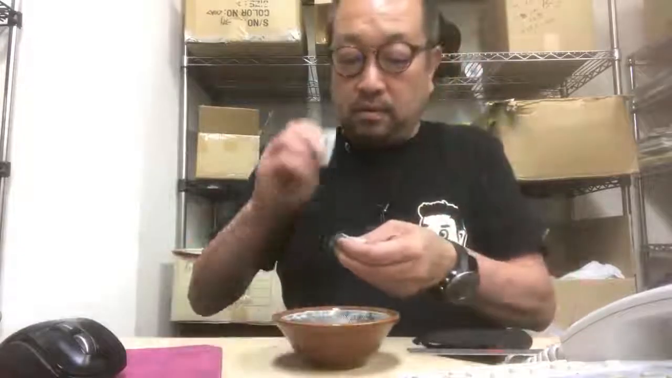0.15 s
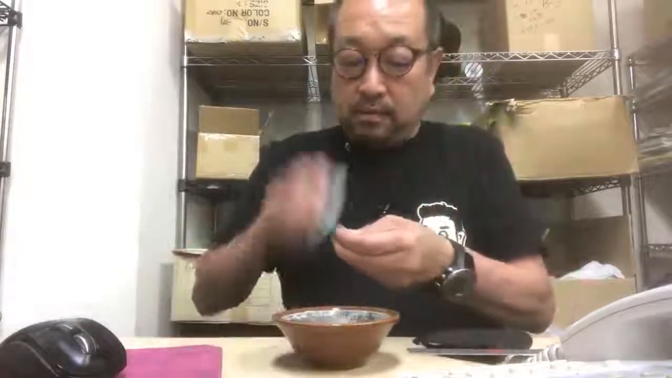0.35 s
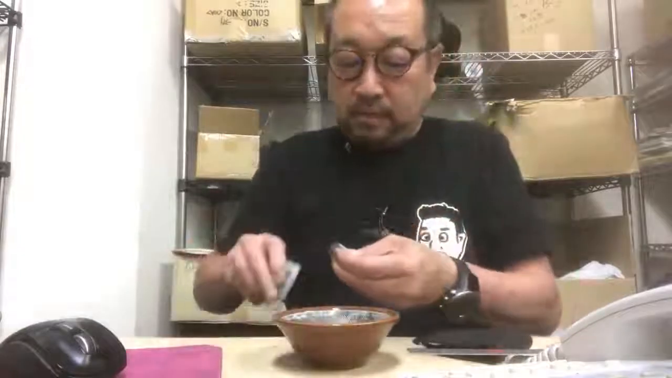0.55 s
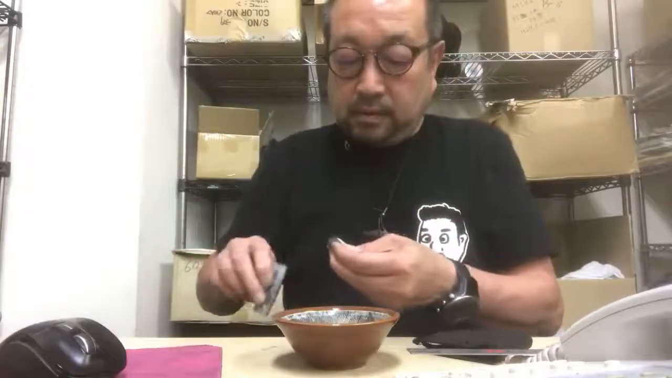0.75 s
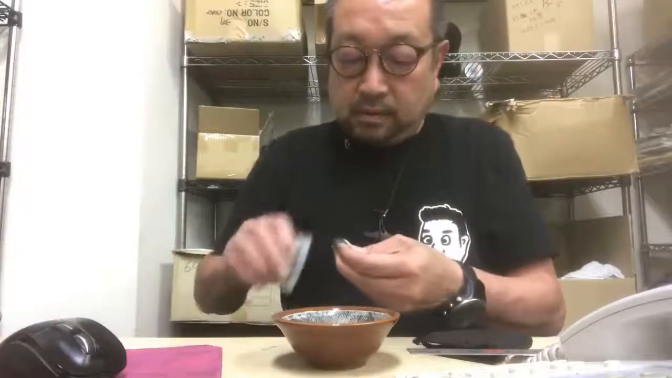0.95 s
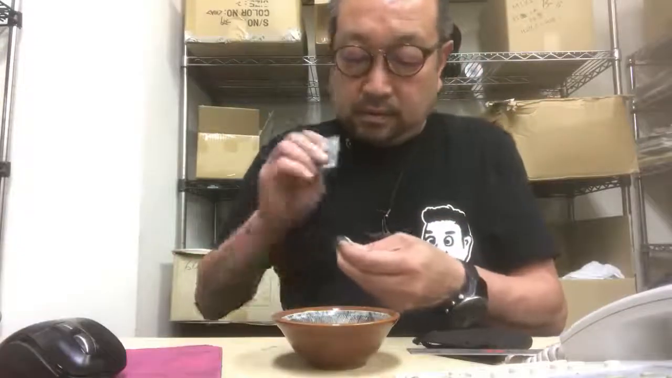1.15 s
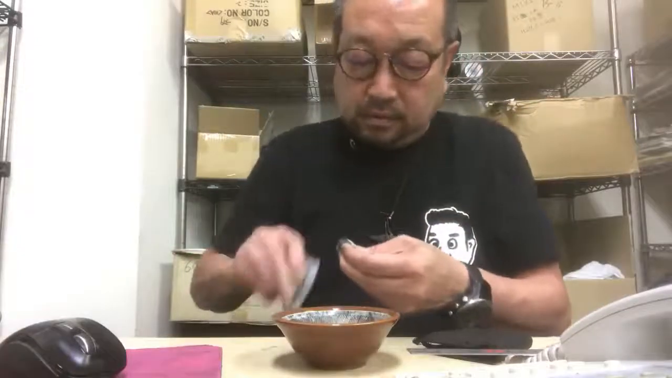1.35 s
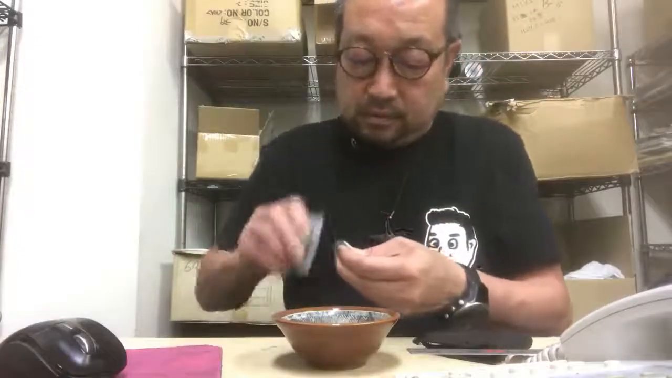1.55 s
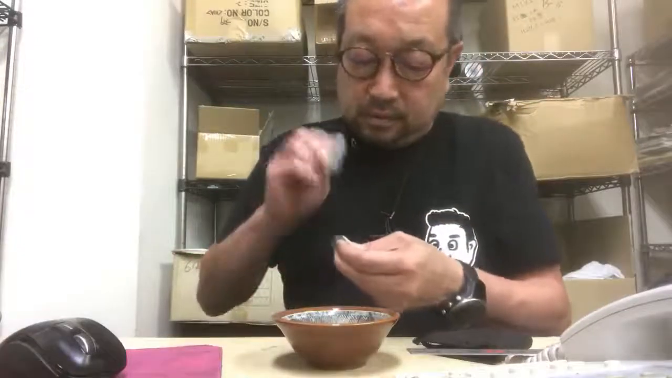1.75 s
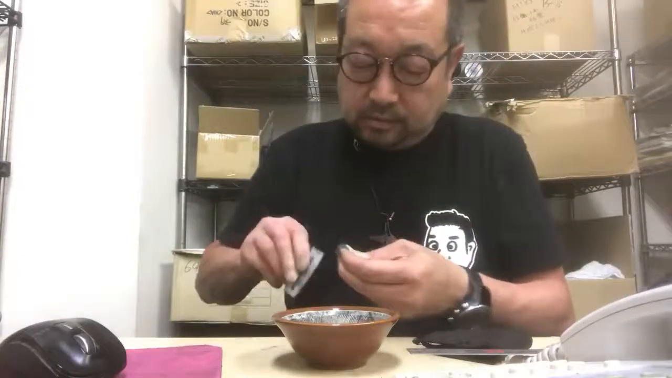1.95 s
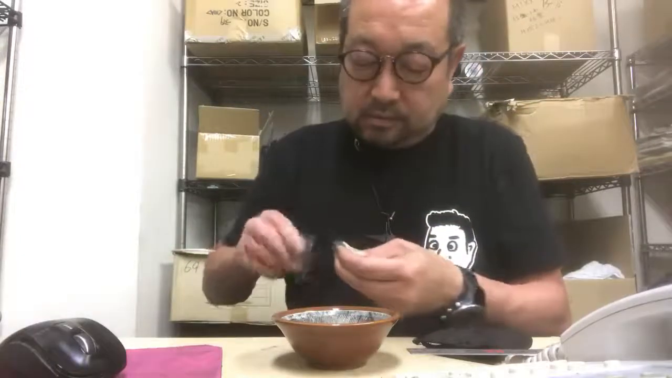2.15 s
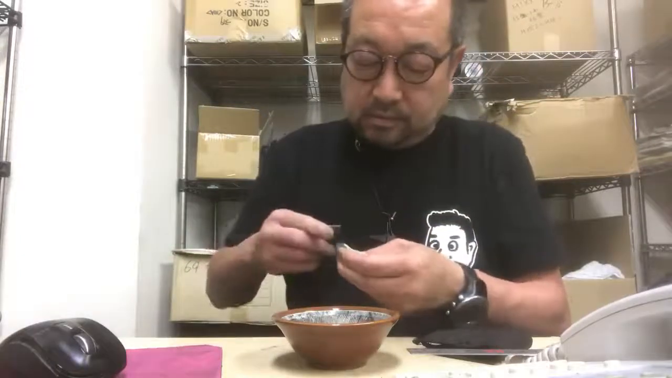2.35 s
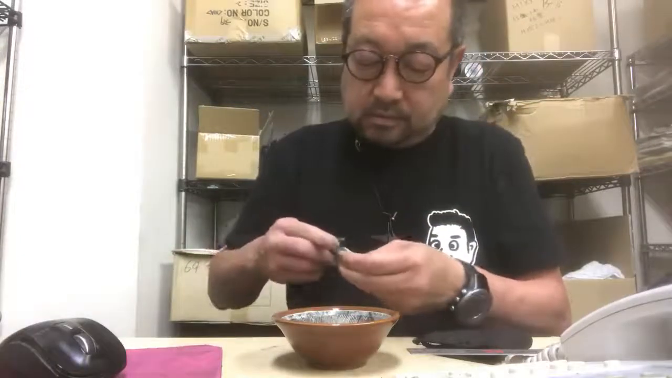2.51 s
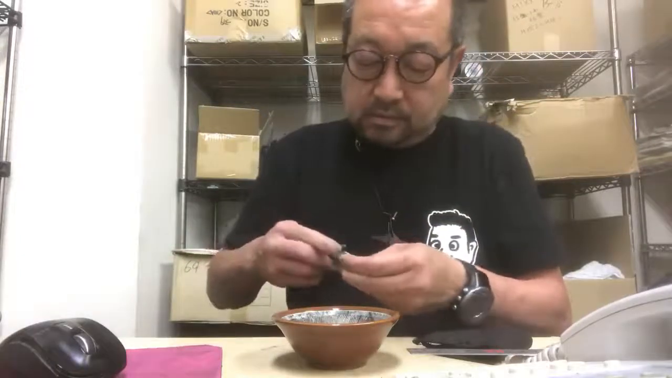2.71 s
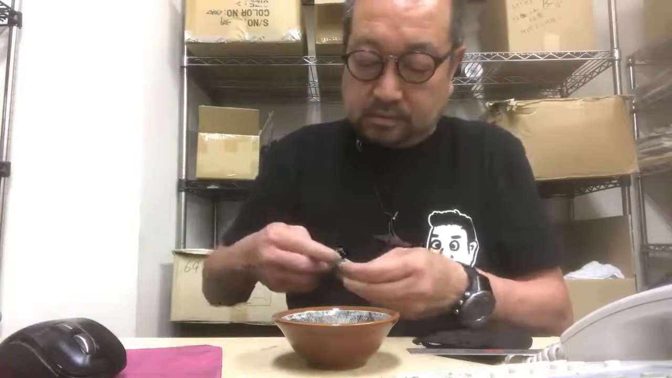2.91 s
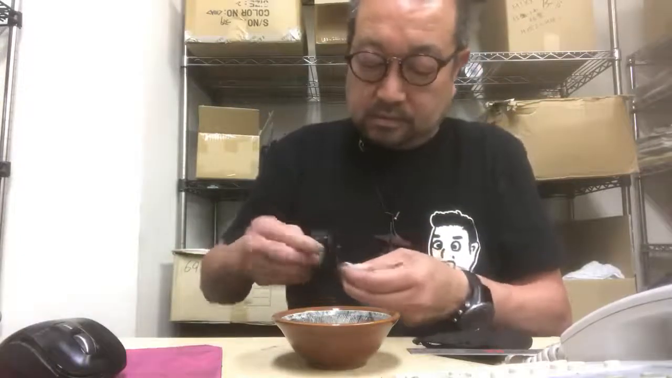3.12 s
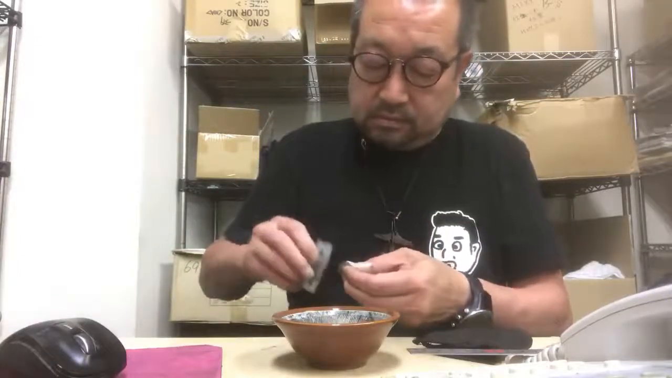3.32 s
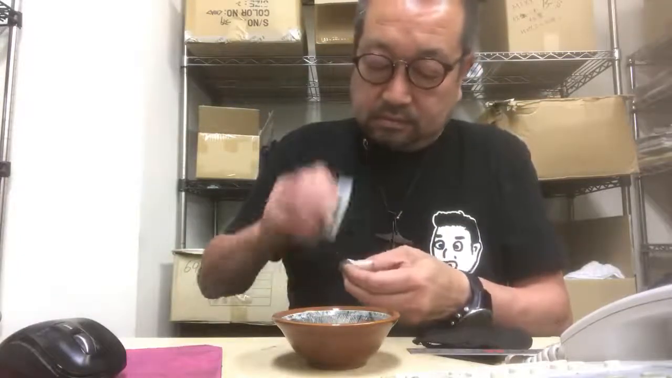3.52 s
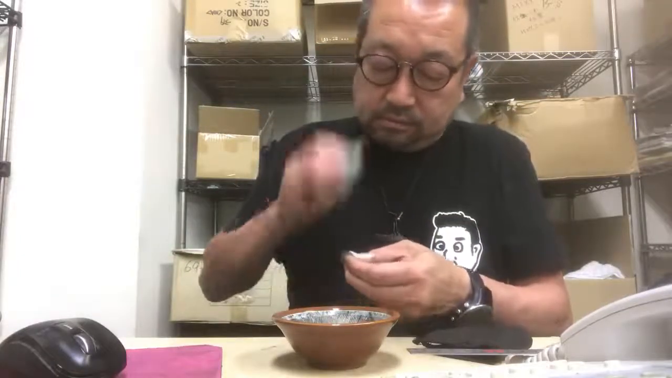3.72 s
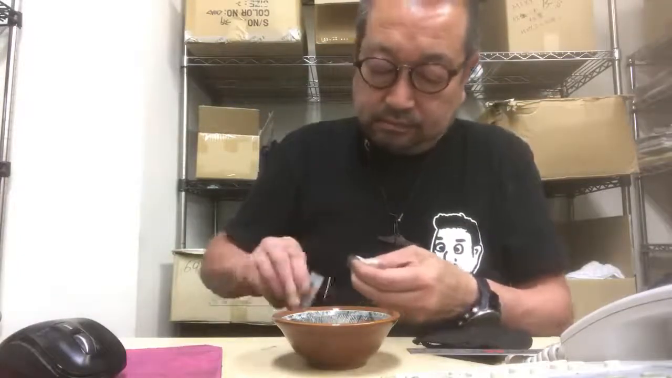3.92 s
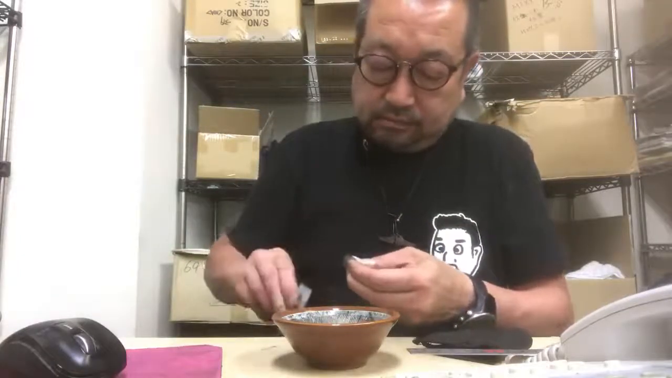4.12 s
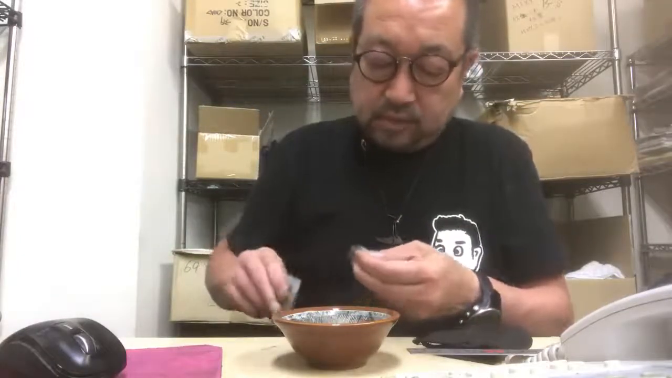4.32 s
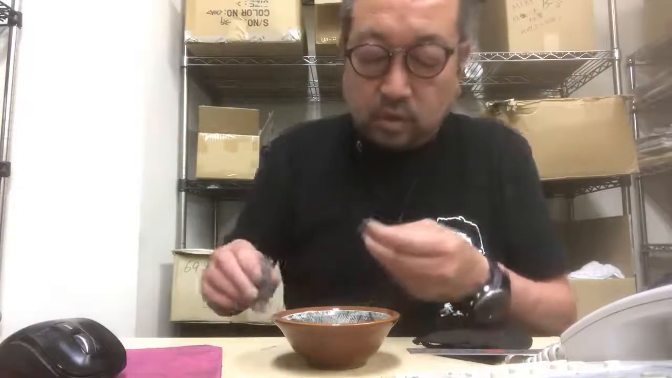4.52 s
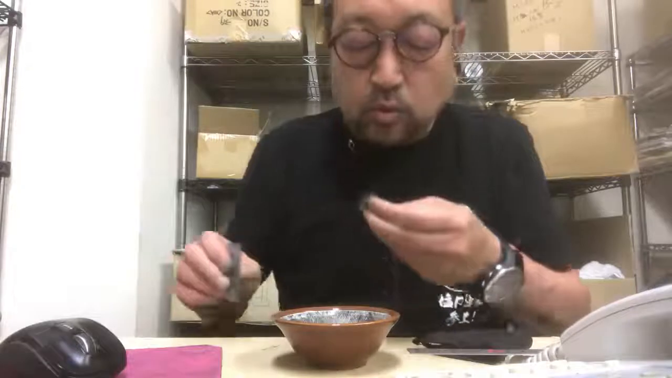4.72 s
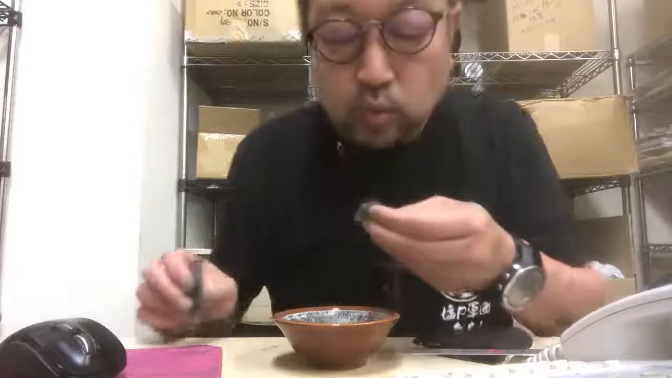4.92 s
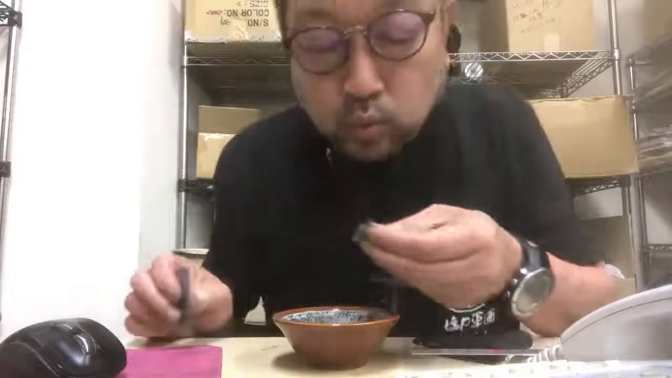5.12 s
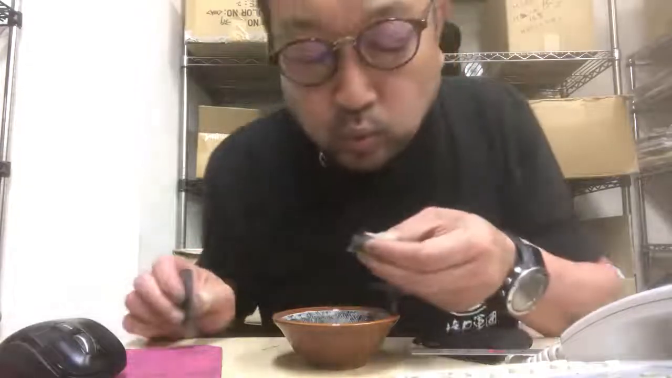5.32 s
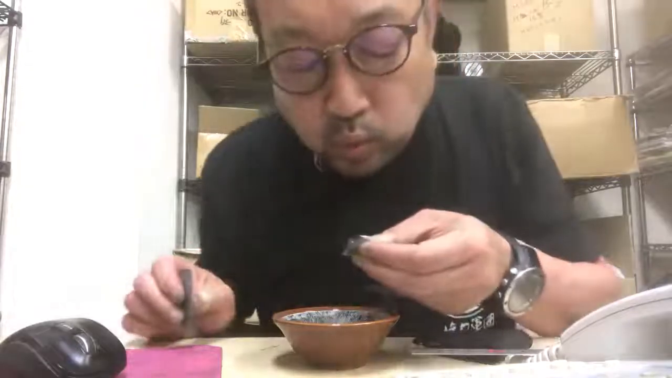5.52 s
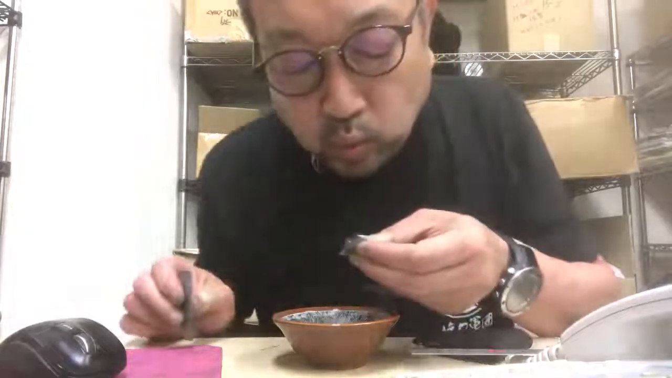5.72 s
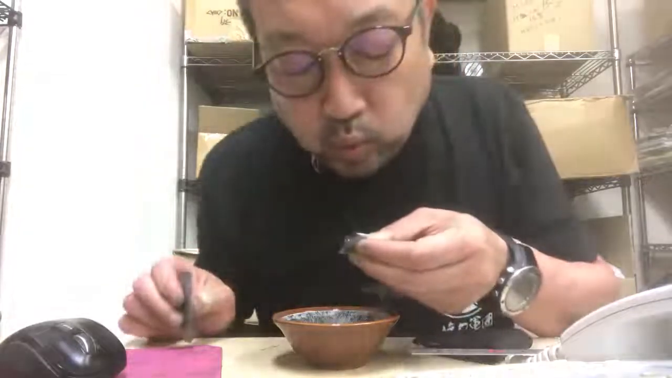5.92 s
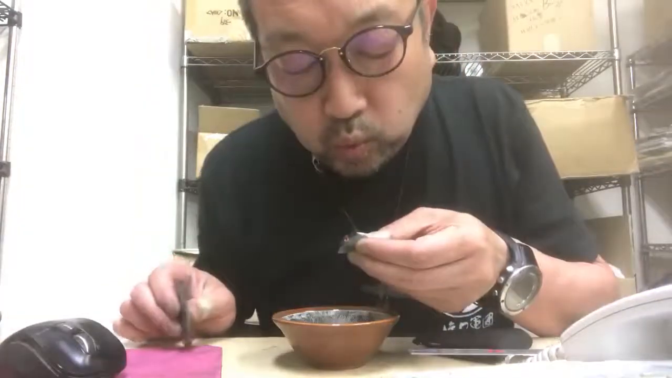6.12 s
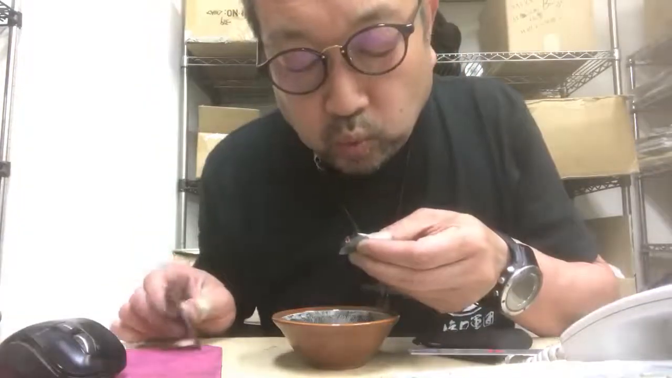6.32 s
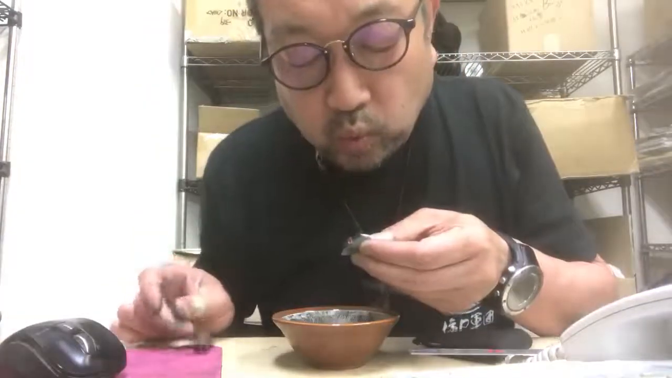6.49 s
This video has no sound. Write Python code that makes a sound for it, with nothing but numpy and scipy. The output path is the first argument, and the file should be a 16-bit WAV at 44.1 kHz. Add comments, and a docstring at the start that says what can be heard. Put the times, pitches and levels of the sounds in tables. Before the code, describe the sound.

Steady low ventilation rumble and soft hiss fill a box-lined room with short echoes. Near the microphone, steel snaps against stone, crisp and scratchy with a very brief ring, then again with a woody table rap, then duller, then once more after a pause. The hiss brightens briefly after most hard strokes. The end is quiet: sparse dry crackles, faint rustling and a short grainy rub of steel on the table.

```python
"""Quick gritty scrapes ring briefly over ventilation rumble and hiss: steel struck down a flint edge.
The second stroke follows through onto the table; later tinder ticks faintly and the steel slides on the table.
Bursts of micro-clicks excite decaying modes of steel and table; coloured noise makes the slides and rustle.
Short echoes of a small storeroom full of cardboard boxes surround these close sounds."""
import sys
import numpy as np
from scipy import signal
from scipy.fft import rfft, irfft
from scipy.io import wavfile

SR = 44100
rng = np.random.default_rng(int(sys.argv[2]) if len(sys.argv) > 2 else 0)


def digitize_waveform(pressure):
    """Quantize a signal to 16-bit integers and store it at the path in sys.argv[1].

    Rows of a 2-D input are taken as channels; values are limited to [-1, 1].
    """
    field = np.atleast_2d(pressure).T
    bounded = np.clip(field, -1, 1)
    quanta = np.round(bounded * 32767).astype(np.int16)
    wavfile.write(sys.argv[1], SR, quanta)


N = 288855


def amp(db):
    """Decibel law: the amplitude gain of a level in dB."""
    return 10 ** (np.asarray(db) / 20)


def rms_one(x):
    """Normalisation of power: scale to unit rms."""
    return x / np.sqrt(np.mean(x ** 2) + 1e-30)


def coloured(x, spectrum):
    """Minimum-phase filtering: a causal response with the given dB, interpolated over log frequency."""
    size = 8192
    hz = np.maximum(np.fft.rfftfreq(size, 1 / SR), 1)
    points = np.array(spectrum)
    gain_db = np.interp(np.log(hz), np.log(points[:, 0]), points[:, 1])
    cepstrum = irfft(np.log(amp(gain_db)))
    # folding the cepstrum onto positive time makes the phase minimal
    cepstrum[1:size // 2] *= 2
    cepstrum[size // 2 + 1:] = 0
    response = irfft(np.exp(rfft(cepstrum)))
    return signal.fftconvolve(x, response)[:len(x)]


def ring(x, hz, t60):
    """Damped resonance: one two-pole mode; a unit click starts a ring of about height 1."""
    r = amp(-60 / (t60 * SR))
    w = 2 * np.pi * hz / SR
    return signal.lfilter([0, np.sin(w)], [1, -2 * r * np.cos(w), r * r], x + 1e-18)


def grit(rows, rough_db, body_hz, treble_hz):
    """Rough contact: each row is a sudden, fading burst of uneven micro-clicks with its own body and treble.

    Rows: start_s, level_db, length_ms (fall to 1/e), treble_db and body_db (both against the middle)."""
    body, middle, treble = np.zeros((3, N))
    clicks = rng.standard_normal(N) * amp(rough_db * rng.standard_normal(N))
    for s, level_db, length_ms, treble_db, body_db in rows:
        at, size = round(s * SR), max(4, round(length_ms * SR / 500))   # cut at twice the length
        spectrum = rfft(clicks[at:at + size])
        # flatten the burst's spectrum, so that the colour comes from the modes and filters
        even = irfft(spectrum / np.abs(spectrum), size)
        fade = np.exp(-np.linspace(0, 2, size) ** 2)
        burst = amp(level_db) * rms_one(even * fade)
        body[at:at + size] += amp(body_db) * burst
        middle[at:at + size] += burst
        treble[at:at + size] += amp(treble_db) * burst
    more_body = signal.lfilter(*signal.butter(2, body_hz, "low", fs=SR), body - middle)
    more_treble = signal.lfilter(*signal.butter(2, treble_hz, "high", fs=SR), treble - middle)
    return middle + more_body + more_treble


def struck(excitation, modes, modes_db, broad, wander_db):
    """Modal superposition: a broad crack plus modes, fed unevenly because the contact point wanders."""
    out = coloured(excitation, broad)
    step = SR // 300   # samples between moves of the contact point
    for k, (hz, level_db, t60) in enumerate(modes):
        moves_db = wander_db * rng.standard_normal(N // step + 1)
        feed = np.repeat(amp(moves_db), step)[:N]
        mode = amp(level_db + modes_db) * ring(excitation * feed, hz, t60)
        out = out + mode * (-1) ** k   # neighbouring modes have opposite sign
    return out


def background():
    """Stationary noise: steady ventilation rumble and hiss, and a brighter hiss that switches on and off."""
    # ventilation rumble and steady hiss: hz, density_db (relative, per Hz)
    room_tone = [(13, -31), (22, -14), (48, 0.5), (74, -4), (100, -3.5), (152, -2.5), (229, -10),
                 (356, -11), (600, -17.5), (1200, -19.5), (1700, -25.5), (2020, -29.5), (3500, -35.5),
                 (7000, -40.5), (15800, -48)]
    # colour of the risen hiss: hz, density_db (relative, per Hz)
    risen_hiss = [(800, -15.5), (2000, -5.5), (4500, -9), (6000, -7), (8500, -11.5), (10300, -13.5),
                  (12000, -15), (15800, -13.5)]
    # the hiss rises for a while after most hard blows: start_s
    hiss_rises = [.57, 1.46, 3.968]
    tone_db, risen_db = -53.5, -65.5   # rms levels
    hold_s, ramp_s = .42, 0.0089   # the hold includes both ramps
    t = np.arange(N) / SR
    on = sum(np.clip(np.minimum(t - s, s + hold_s - t) / ramp_s, 0, 1) for s in hiss_rises)
    tone = amp(tone_db) * rms_one(coloured(rng.standard_normal(N), room_tone))
    return tone + on * amp(risen_db) * rms_one(coloured(rng.standard_normal(N), risen_hiss))


def contacts():
    """Stick-slip: a stroke is an even run of catches, then a drag; one light touch is a catch and a graze."""
    # strokes down the flint edge: start_s, level_db, gap_ms (between catches), loss_db (per catch),
    # drag_db, treble_db and body_db (both against the middle)
    strokes = [(0.5680, -10, 1.67, 7.6, -24, 1.5, -4), (1.4319, -19.5, 2.5, -1.3, -32, 1, -6),
               (2.0127, -18.5, 2.1, 0.5, -29, -7, -4.5), (3.9699, -18, 4.7, 3.3, -30, -2, -2.1)]
    bite_ms, catch_share = 6.9, .72   # time of repeated catching; length of a catch as a share of the gap
    drag_after_ms, drag_ms, drag_body_db = 9.3, 8.0, 3   # then it drags off the edge, with more body
    touch_s, touch_db, touch_ms, graze_db, graze_ms = 3.5161, -34.5, .15, -67.5, 20
    rows = [(touch_s, touch_db, touch_ms, 0, 0), (touch_s, graze_db, graze_ms, 0, 0)]
    for s, level_db, gap_ms, loss_db, drag_db, treble_db, body_db in strokes:
        for k in range(int(np.ceil(bite_ms / gap_ms))):
            catch_s = s + k * gap_ms / 1000
            rows.append((catch_s, level_db - k * loss_db, catch_share * gap_ms, treble_db, body_db))
        rows.append((s + drag_after_ms / 1000, drag_db, drag_ms, treble_db, body_db + drag_body_db))
    return rows


def steel_on_flint():
    """Forced vibration: the gritty contacts crack the stone and excite the finger-damped steel."""
    # modes of the steel, damped by the fingers: hz, level_db (relative), t60_s
    steel_modes = [(4030, -3, .012), (5500, -4, .008), (6300, 2.5, .008), (6990, 0, .012), (8020, -5, .01),
                   (11000, -5, .01), (11700, -4, .008), (13700, -6, .008), (14640, -3, .025),
                   (15680, -6, .025)]
    # crack of the chipping stone: hz, level_db
    crack = [(180, -14), (500, -12.5), (2000, -11), (2800, -18.5), (4000, -3), (6500, 0), (9000, -5.5),
             (10300, -0.5), (12000, -2), (14500, 0), (16000, -9)]
    scrape = grit(contacts(), rough_db=4.0, body_hz=2800, treble_hz=9500)
    return struck(scrape, steel_modes, -35, crack, wander_db=3)


def steel_on_table():
    """Impact excitation: knocks of the steel set off a broad rap and the modes of the table top."""
    # steel knocking on the table: start_s, level_db, length_ms, treble_db and body_db (against the middle)
    knocks = [(1.4714, -23.5, 2.9, 0, -2), (1.4762, -17.5, 4.5, 6.5, 4), (4.5700, -62.5, 5.5, -8, -3)]
    # modes of the table top: hz, level_db (relative), t60_s
    table_modes = [(135, -0.5, 0.13), (208, -6, 0.1), (460, 0, 0.097), (580, -8, 0.05), (736, 3.5, 0.065),
                   (817, -5, .04), (888, 0, 0.061), (1054, -12, 0.07), (1258, -9, 0.08), (1438, 3, 0.06),
                   (1726, 20.5, 0.012), (1930, 7, 0.047), (2250, 0, 0.1), (3034, -5, 0.032),
                   (4170, -2, 0.025)]
    # broad rap under the table modes: hz, level_db
    rap = [(70, -31.5), (120, -11), (300, 0), (800, 8.5), (1500, 6.5), (2600, -6), (4000, -5.5),
           (6000, -15.5), (10000, -16), (14000, -16), (16000, -40)]
    knocking = grit(knocks, rough_db=3.0, body_hz=500, treble_hz=3000)
    table = struck(knocking, table_modes, -40, rap, wander_db=2.0)
    # the table's sound is cut off below 95 Hz
    return signal.sosfilt(signal.butter(4, 95, "high", fs=SR, output="sos"), table)


def tinder():
    """Crackling as impulsive noise: crumbling ticks, the faint ones at random, over a grainy rustle."""
    # clearest ticks of the tinder: start_s, level_db, treble_db (against the middle)
    clear_ticks = [(4.7724, -56.5, -6), (4.8932, -52, -5), (5.3112, -54, -4), (5.3287, -52, -4),
                   (5.6589, -58.5, -2), (5.848, -54, -7), (5.8714, -51, -7), (5.9208, -57, -8),
                   (5.9942, -51.5, 3), (6.1189, -61.5, -3), (6.1765, -61, -3), (6.2426, -54, -11),
                   (6.3179, -63, -2), (6.3479, -52, -2), (6.3703, -58, -2), (6.405, -58, -2),
                   (6.4591, -58, 6), (6.474, -56, 3), (6.498, -55, -3), (6.514, -53.5, -4)]
    # colour of a tick: hz, level_db
    tick_colour = [(1500, -22), (3500, -4), (6000, 2), (8500, -5), (10300, -5), (12000, -2), (15000, -5)]
    tick_ms, crumble_db, crumble_ms = .7, -14, 9   # each tick crumbles on, more quietly
    # the fingers start to rustle and get busier; level before colouring
    rustle_from_s, rustle_db, rustle_db_per_s = 4.22, -80, 3
    faint_per_s2, faint_db, faint_spread_db = 14, -51, 3   # faint ticks grow denser at a steady rate
    rows = []
    for s, level_db, treble_db in clear_ticks:
        rows.append((s, level_db, tick_ms, treble_db, 0))
        rows.append((s, level_db + crumble_db, crumble_ms, treble_db, 0))
    ticks = grit(rows, rough_db=4.0, body_hz=2000, treble_hz=9000)
    since = np.arange(N) / SR - rustle_from_s
    happens = rng.random(N) < faint_per_s2 * since / SR
    faint = happens * amp(faint_db + faint_spread_db * rng.standard_normal(N))
    grains = rng.standard_normal(N) * amp(7.5 * rng.standard_normal(N))
    rustle = rms_one(grains) * amp(rustle_db + rustle_db_per_s * since)
    return coloured(ticks + (faint + rustle) * (since > 0), tick_colour)


def slides():
    """Sliding friction: grainy noise swells and fades, with shares of treble and body that differ by slide."""
    # steel sliding on the table: loudest_s, level_db, treble_db and body_db (both against the middle)
    rubs = [(4.841, -54, -5.5, 5), (5.095, -62.5, -8, 2.2), (5.285, -41.5, -6.5, -5.5), (5.331, -48, 6, 12)]
    # colour of a slide: hz, level_db
    slide_colour = [(400, -7.5), (800, 1), (1200, 9), (2300, 11.5), (2900, -0.5), (3600, 1), (7000, -11),
                    (14000, -19)]
    rise_ms, fall_ms = 8.9, 14   # times to 1/e
    ms, swells = np.arange(N) / SR * 1000, 0
    for s, level_db, treble_db, body_db in rubs:
        late = ms - s * 1000
        rise = np.exp(-(late / rise_ms) ** 2)
        fall = np.exp(-np.abs(late) / fall_ms)
        swell = amp(level_db) * np.where(late < 0, rise, fall)
        swells = swells + swell * amp([[body_db], [0], [treble_db]])
    grains = rng.standard_normal(N) * amp(4.7 * rng.standard_normal(N))
    body, middle, treble = swells * rms_one(grains)
    more_body = signal.lfilter(*signal.butter(2, 1000, "low", fs=SR), body - middle)
    lower = signal.lfilter(*signal.butter(2, 3200, "low", fs=SR), middle)
    upper = signal.lfilter(*signal.butter(2, 3200, "high", fs=SR), treble)
    return coloured(more_body + lower + upper, slide_colour)


def room(x):
    """Reverberation as decaying noise: dense echoes off shelves and boxes die away band by band."""
    # reverberation of the room: hz, t60_s
    room_t60 = np.array([(200, 0.12), (1000, 0.15), (4000, 0.077), (9000, 0.14), (15000, 0.044)])
    room_db, build_up_s = -6, 0.0023
    late_db, late_t60_s = -20.5, 0.313   # a weaker, longer tail from the far end of the room
    t = np.arange(SR // 2) / SR
    edges = [*(60 * 2.0 ** np.arange(0, 9)), 20000]   # octave bands, the last one narrower, in Hz
    echoes = 0
    for low, high in zip(edges[:-1], edges[1:]):
        band_filter = signal.butter(2, [low, high], "band", fs=SR, output="sos")
        band = signal.sosfilt(band_filter, rng.standard_normal(len(t)))
        t60 = np.interp(np.log(low * high) / 2, np.log(room_t60[:, 0]), room_t60[:, 1])
        decay = amp(-60 * t / t60) + amp(late_db - 60 * t / late_t60_s)
        echoes = echoes + band * decay
    echoes = echoes * np.clip(t / build_up_s, 0, 1) ** 2
    unit_energy = echoes / np.sqrt(np.sum(echoes ** 2))
    return amp(room_db) * signal.fftconvolve(x, unit_energy)[:N]


def scene():
    """Superposition: the close sources, their echoes in one room, and the background add up."""
    close = steel_on_flint() + steel_on_table() + slides() + tinder()
    return (close + room(close) + background())[None]


def record(dry):
    """Linear filtering: the microphone in its housing dents the treble, and the top is cut steeply."""
    # colour of the microphone in its housing: hz, level_db
    microphone = [(4300, 2), (4900, -2.5), (5400, 0.5), (7800, 0.5), (8500, -3), (9300, 0), (10300, -5),
                  (11500, 0)]
    cutoff_hz = 15850
    heard = coloured(dry[0], microphone)
    return signal.sosfilt(signal.ellip(12, .5, 70, cutoff_hz, fs=SR, output="sos"), heard)[None]


dry = scene()
out = record(dry)
digitize_waveform(out)
```